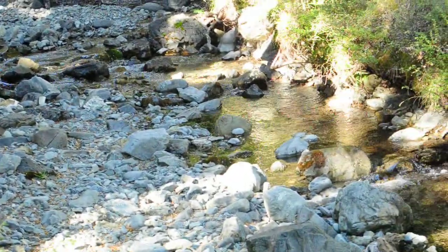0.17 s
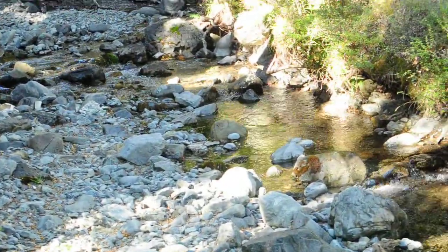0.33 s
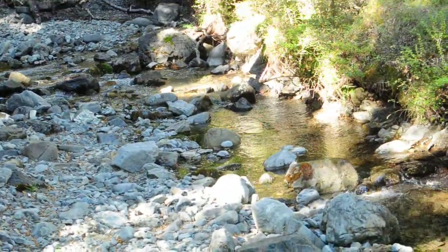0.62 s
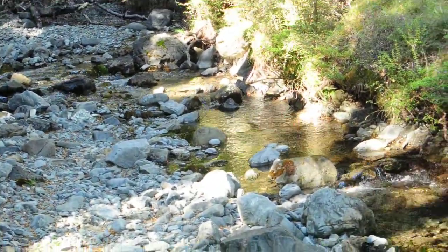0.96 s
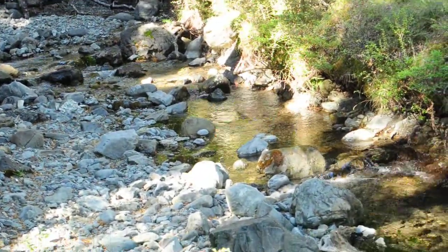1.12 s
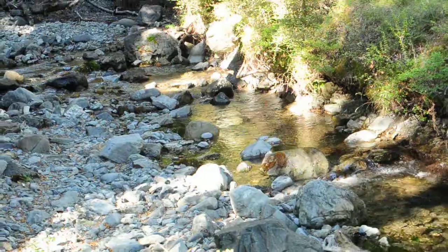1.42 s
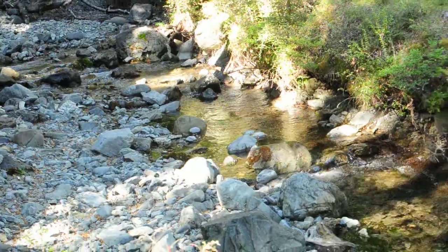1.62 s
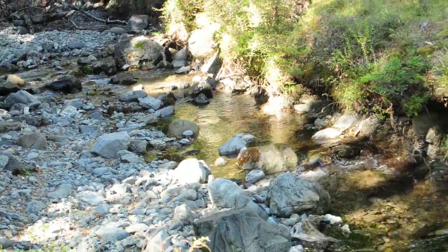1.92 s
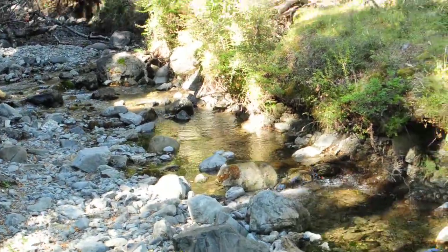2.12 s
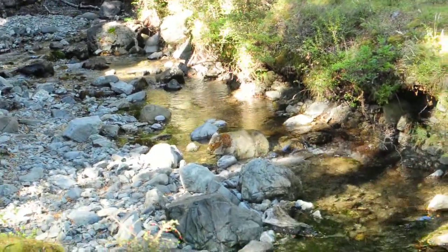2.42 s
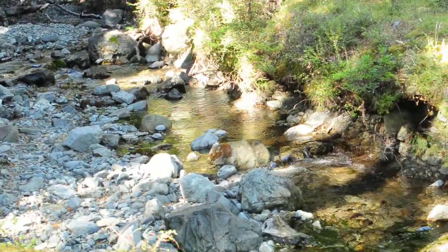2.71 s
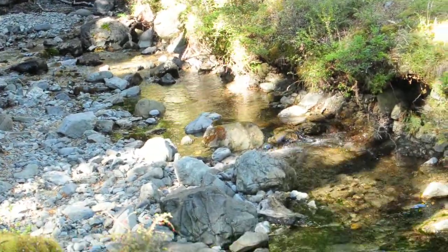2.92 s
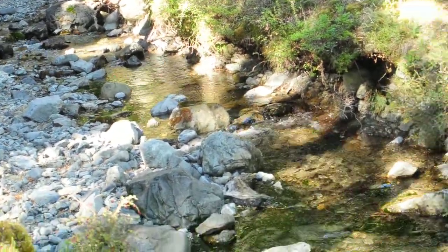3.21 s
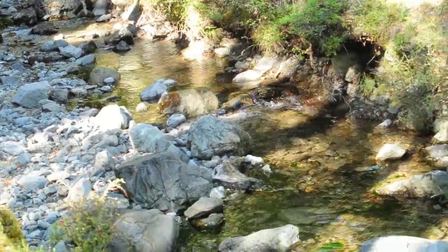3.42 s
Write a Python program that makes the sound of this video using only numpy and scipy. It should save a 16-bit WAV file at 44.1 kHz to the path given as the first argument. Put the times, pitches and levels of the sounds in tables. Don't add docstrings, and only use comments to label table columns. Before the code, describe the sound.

Steady stream water, hissing spray over a faint low churn, with ringing bubbles, ticking droplets and late stronger gurgles; very soft finger bumps and one creak-click from the hand-held recorder, outdoors and dry.

```python
import sys
import numpy as np
from scipy import signal
from scipy.fft import rfft, irfft
from scipy.io import wavfile

SR = 44100
rng = np.random.default_rng(int(sys.argv[2]) if len(sys.argv) > 2 else 0)


def int16_out(signal):
    q = np.round(np.clip(np.atleast_2d(signal).T, -1, 1) * 32767)
    wavfile.write(sys.argv[1], SR, q.astype(np.int16))


def voltage_ratio(level):
    return 10 ** (np.asarray(level, float) / 20)


N = 156996


def rms_one(x):
    return x / np.sqrt(np.mean(x ** 2) + 1e-20)


def at_hz(points, hz):
    f, db = np.transpose(points)
    return np.interp(np.log(hz), np.log(f), db)


def butter(x, order, hz, kind):
    return signal.sosfilt(signal.butter(order, hz, kind, fs=SR, output="sos"), x)


def drift(rate_hz):
    r = np.exp(-80 * np.pi * rate_hz / SR)
    steps = rng.standard_normal(N // 40 + 2002)
    slow = signal.lfilter([1], [1, -2 * r, r * r], steps)[2000:]
    slow = rms_one(slow - slow.mean())
    return np.interp(np.arange(N) / 40, np.arange(len(slow)), slow)


def ring(clicks, hz, t60):
    r, w = voltage_ratio(-60 / (t60 * SR)), 2 * np.pi * hz / SR
    return signal.lfilter([0, np.sin(w)], [1, -2 * r * np.cos(w), r * r], clicks + 1e-18)


def hiss(spectrum, shared_db, own_db, rate_hz):
    hz = np.maximum(np.fft.rfftfreq(N, 1 / SR), 1)
    inside = (hz > spectrum[0][0]) & (hz < spectrum[-1][0])
    shaped = rfft(rng.standard_normal(N)) * voltage_ratio(at_hz(spectrum, hz)) * inside
    step = 2 * np.log2(hz)
    together = drift(rate_hz)
    out = 0
    for k in range(int(step[inside].min()), int(step[inside].max()) + 2):
        band = irfft(shaped * np.clip(1 - abs(step - k), 0, 1), N)
        out = out + voltage_ratio(shared_db * together + own_db * drift(rate_hz)) * band
    return rms_one(out)


def grains(per_s, cycles, spread_db, pitches, gains_db, clump_db, clump_rate_hz):
    soft_cycles = 3.1
    sizes = voltage_ratio(spread_db * np.minimum(rng.exponential(1, N), 4)) * rng.choice([-1, 1], N)
    born = rng.random(N) < per_s * voltage_ratio(clump_db * drift(clump_rate_hz)) / SR
    dealt = rng.integers(0, len(pitches), N)
    out = 0
    for k, (hz, gain_db) in enumerate(zip(pitches, gains_db)):
        soft = ring(sizes * born * (dealt == k), hz, soft_cycles / hz)
        out = out + voltage_ratio(gain_db) * rms_one(ring(soft, hz, cycles / hz))
    return rms_one(out)


def blips(rows, cycles, rise, swell, gain_db):
    out = np.zeros(N + SR)
    for s, db, hz in rows:
        turn = np.arange(int(cycles / hz * SR)) / SR * hz
        shape = (1 - np.exp(-turn / swell)) * voltage_ratio(-60 * turn / cycles)
        tone = np.sin(2 * np.pi * turn * (1 + rise * turn / cycles))
        i = int(s * SR)
        out[i:i + len(turn)] += voltage_ratio(db + gain_db) * shape / shape.max() * tone
    return out[:N]


# t/s, level/dB
FLOW_STRENGTH = [(0, -34.5), (.2, -32.5), (.45, -33.5), (.85, -33), (1.15, -34), (1.4, -32), (1.75, -33.5),
                 (1.9, -31.5), (2.1, -33.5), (2.3, -31.5), (2.55, -33.5), (2.75, -32), (2.92, -33),
                 (3.05, -31.5), (3.2, -32.5), (3.28, -33), (3.4, -32), (3.56, -33.5)]


def flow_swing():
    s, db = np.transpose(FLOW_STRENGTH)
    return np.interp(np.arange(N) / SR, s, db - db.mean())


# f/Hz, level/dB (per Hz)
SPRAY_COLOUR = [(560, -16.5), (780, -4), (1200, 0.5), (1600, -5), (2100, -4), (6300, -15), (9500, -27),
                (15700, -50.5)]


def spray(swing):
    return voltage_ratio(-34.5 + 0.7 * swing) * hiss(SPRAY_COLOUR, shared_db=1.0, own_db=1.92, rate_hz=78)


# f/Hz, level/dB (per Hz)
CHURN_COLOUR = [(18, -19), (70, -24.5), (170, -11), (228, -12.5), (305, -1.5), (400, -4), (520, -7),
                (700, -12)]


def churn(swing):
    return voltage_ratio(-49 + swing) * hiss(CHURN_COLOUR, shared_db=1.5, own_db=1.5, rate_hz=20)


# f/Hz, level/dB
BUBBLE_LOUDNESS = [(260, -29), (320, -11.5), (560, -17), (780, -2), (1200, -3), (2100, -1), (4000, -13.5),
                   (8000, -9.5)]


def bubbles(swing):
    pitches = np.geomspace(260, 8000, num=40)
    gains_db = at_hz(BUBBLE_LOUDNESS, pitches)
    return voltage_ratio(-38.5 + swing) * grains(per_s=1500, cycles=37, spread_db=2, pitches=pitches,
                                       gains_db=gains_db, clump_db=2, clump_rate_hz=30)


def drops(swing):
    pitches = np.geomspace(2200, 10000, num=12)
    gains_db = -4.5 * np.log2(pitches / 2000)
    return voltage_ratio(-44.5 + 0.7 * swing) * grains(per_s=1200, cycles=12, spread_db=4, pitches=pitches,
                                             gains_db=gains_db, clump_db=6.5, clump_rate_hz=40)


# t/s, level/dB (peak), f/Hz
GURGLES = [(0.115, -23, 1260), (0.141, -29, 1200), (0.218, -20.5, 1270), (0.313, -23, 1230),
           (0.5, -24, 1070), (0.542, -19, 1254), (0.722, -27, 955), (0.786, -22.5, 1210),
           (0.8883, -23.5, 1150), (1.196, -21, 1250), (1.356, -26, 1280), (1.389, -22, 870),
           (1.526, -21.5, 776), (1.561, -24, 907), (1.846, -24, 1210), (1.985, -22, 1390),
           (2.157, -23.5, 1080), (2.181, -24, 1180), (2.215, -16.5, 1170), (2.286, -20, 860),
           (2.647, -21, 767), (2.697, -20, 1240), (2.978, -24, 786), (3.013, -17.5, 1140),
           (3.051, -23, 790), (3.067, -17.5, 950), (3.111, -16, 1164), (3.195, -14.5, 1220),
           (3.367, -19, 950), (3.477, -25, 1180)]
# t/s, level/dB (peak), f/Hz
MORE_GURGLES = [(.159, -23.5, 1065), (.345, -25, 1200), (.365, -24, 1590), (.856, -25, 2450),
                (.861, -23, 1980), (.872, -25, 1310), (.916, -25, 2010), (.997, -25, 1030),
                (1.06, -24, 1050), (1.077, -23, 2020), (1.222, -23, 1190), (1.328, -23, 1280),
                (1.37, -22, 810), (1.415, -24, 1200), (1.484, -28, 1050), (1.602, -24.5, 1100),
                (1.622, -27, 1060), (1.642, -27, 850), (1.915, -20, 1166), (1.933, -23, 1110),
                (2.2156, -23, 1100), (2.233, -25, 1050), (2.293, -28, 990), (2.311, -23, 1050),
                (2.319, -20, 1010), (2.725, -23, 1170), (3.085, -23, 1210), (2.85, -25, 1900),
                (2.872, -23, 1950), (3.204, -23.5, 1730), (3.541, -24, 826)]


def gurgles():
    rows = list(GURGLES) + list(MORE_GURGLES)
    return blips(rows, cycles=24, rise=0.16, swell=0.41, gain_db=-3)


# t/s, level/dB (peak), f/Hz
STONE_POPS = [(0.1371, -20, 2130), (0.175, -20, 1770), (0.2673, -20, 1960), (0.3502, -14, 1640),
              (0.5886, -17.5, 2030), (0.721, -20, 2430), (0.8205, -24, 1990), (1.001, -22, 1680),
              (1.3174, -17, 2200), (1.6955, -24, 2050), (1.9031, -14, 2880), (1.929, -24, 2110),
              (2.319, -25, 2760), (2.3456, -25.5, 2110), (2.4428, -19, 2020), (2.5062, -17, 1850),
              (2.599, -28.5, 2220), (2.7574, -18, 1700), (2.9676, -21, 2010), (3.0076, -20.5, 1610),
              (3.033, -21, 1970), (3.1313, -17, 2050), (3.1944, -23, 2190), (3.3847, -17, 2170)]


def pops():
    return blips(STONE_POPS, cycles=21.4, rise=0.13, swell=0.8, gain_db=-7.5)


# t/s, level/dB (peak), f/Hz
SMALL_DROPLETS = [(0.1398, -32.0, 4310.0), (0.1797, -32, 3600), (0.1992, -32, 4010.0),
                  (0.2283, -39, 6630.0), (0.2806, -30, 5680.0), (0.2835, -31.0, 4090.0),
                  (0.2981, -35, 7450.0), (0.3111, -45.0, 8960.0), (0.352, -37.0, 6680.0),
                  (0.354, -39, 8830.0), (0.4244, -38, 8830.0), (0.6064, -33, 6290.0),
                  (0.7515, -33.0, 5170.0), (0.8454, -38, 8570.0), (0.8883, -39, 8660.0),
                  (0.9162, -39, 8010.0), (1.3587, -28.5, 6160.0), (1.3619, -28, 3010.0),
                  (1.444, -42, 8740.0), (1.4609, -33, 6240.0), (1.5034, -39.0, 7280.0),
                  (1.5617, -39.0, 7280.0), (1.5759, -30, 2760.0), (1.592, -30, 3960.0),
                  (1.686, -39, 8270.0), (1.8762, -28, 2790), (1.9065, -42.0, 8400.0),
                  (2.123, -37.0, 7110.0), (2.1633, -34.0, 5990.0), (2.1933, -39.0, 7540.0),
                  (2.2156, -33.0, 4650.0), (2.2657, -40, 8440.0), (2.3182, -32, 2700),
                  (2.3185, -40.0, 7710.0), (2.3245, -35, 7020.0), (2.3314, -34, 4480.0),
                  (2.3769, -32, 6200.0), (2.3933, -34.0, 6200.0), (2.4202, -33.0, 5940.0),
                  (2.4762, -36, 8270.0), (2.5056, -35, 8350.0), (2.6227, -35, 5080.0),
                  (2.6956, -28, 6070.0), (2.7976, -29, 2920), (2.8563, -43, 8140.0), (2.967, -27, 1940.0),
                  (3.0058, -32, 3660.0), (3.0071, -29.5, 2730), (3.1192, -42.0, 7920.0),
                  (3.1494, -30.5, 3340), (3.1919, -31.0, 4820.0), (3.2848, -41, 7710.0),
                  (3.3155, -31, 3490.0), (3.3412, -32, 6460.0), (3.5068, -33, 8310.0), (3.535, -32, 3600)]


def droplets():
    return blips(SMALL_DROPLETS, cycles=24, rise=0.057, swell=1.3, gain_db=4)


# t/s, level/dB (peak), f/Hz
STONE_TICKS = [(0.2284, -30, 3930), (0.2563, -31, 4600), (0.2813, -32, 4170), (0.3526, -29, 4080),
               (0.3915, -30, 4030), (0.5357, -25, 5200), (0.618, -26, 4050), (0.7243, -26, 4540),
               (0.7517, -26, 5680), (1.5868, -26, 4460), (1.6312, -27, 5180), (1.6866, -31, 4220),
               (1.8437, -29, 3860), (1.9031, -25, 4420), (2.156, -25, 4370), (2.1939, -26.5, 4210),
               (2.3181, -29, 4450), (2.4204, -27.5, 4590), (2.5032, -27, 4920), (2.6209, -35, 5140),
               (2.6958, -20.5, 5030), (3.04, -18.5, 5670), (3.1408, -27, 4160), (3.1916, -26, 4900),
               (3.3413, -30, 4800), (3.3887, -24, 4660), (3.454, -27, 5200), (3.5064, -35, 4590)]


def ticks():
    return blips(STONE_TICKS, cycles=21, rise=0.19, swell=1.0, gain_db=0.5)


# t/s, level/dB (peak), f/Hz
FINGER_BUMPS = [(.375, -59, 35), (.72, -43, 170), (1.365, -46, 164), (1.535, -52, 135), (1.955, -42, 156),
                (2.345, -54, 109), (3.125, -37, 201), (3.165, -49, 130), (3.285, -43.5, 180),
                (3.385, -52, 125), (3.47, -49, 130)]


def bumps():
    return blips(FINGER_BUMPS, cycles=7, rise=-0.064, swell=0.84, gain_db=0)


# t/s, level/dB (peak), f/Hz
HARD_SNAPS = [
    (.8448, -39, 10000),
    (.8462, -58, 14200),
    (.848, -19.5, 2200),
    (.8884, -18.5, 1520),
    (.891, -24.5, 1600),
    (1.0506, -13.5, 3180),
    (2.2404, -15, 2620),
]


def snaps():
    return blips(HARD_SNAPS, cycles=7.5, rise=0.037, swell=0.82, gain_db=0.5)


# t/s, level/dB (peak), f/Hz
HOLLOW_GLUGS = [
    (1.365, -34, 307),
    (1.907, -38.5, 310),
    (2.79, -32.5, 415),
    (3.01, -31, 320),
    (3.11, -26.5, 318),
]


def glugs():
    return blips(HOLLOW_GLUGS, cycles=8.1, rise=-0.098, swell=1.3, gain_db=-0.93)


def rasp():
    start_s, length_s = 1.9826, 0.0098
    t = np.arange(N) / SR - start_s
    fade = voltage_ratio(-6 * np.clip(t / length_s, 0, 1))
    burst = rng.standard_normal(N) * (t > 0) * (t < length_s) * fade
    return voltage_ratio(-37) * butter(burst, 2, [8500, 1.36 * 8500], "band")


# t/s, level/dB
CREAK_SLIPS = [
    (1.983, -20),
    (1.9848, -14),
    (1.985, -16),
    (1.986, -8.5),
    (1.9876, -16),
    (1.9876, -18),
    (1.9883, -17),
    (1.9903, -20),
    (1.9905, -23),
    (1.9940, -25),
]
# f/Hz, level/dB, t60/s (time to fall 60 dB)
HOUSING_RINGS = [(1580, -14, 0.013), (2620, -5.5, 0.0065), (2930, -2, 0.0078), (3580, -3.5, 0.0064),
                 (4300, -9.5, 0.005), (5340, -16.5, 0.0049), (6030, -17, 0.0053), (6670, -16, 0.006),
                 (7400, -17, 0.0057), (7950, -19.5, 0.005), (10700, -34, 0.0027)]


def creak():
    s, db = np.transpose(CREAK_SLIPS)
    out = 0
    for k, (hz, level_db, t60) in enumerate(HOUSING_RINGS):
        clicks = np.zeros(N)
        uneven_db = rng.normal(0, 1.1, len(s))
        clicks[(s * SR).astype(int)] = voltage_ratio(db + level_db + 2.5 + uneven_db) * (-1) ** k
        out = out + ring(clicks, hz, t60)
    return butter(out, 3, [1200, 11500], "band")


def stream():
    swing = flow_swing()
    near = bubbles(swing) + drops(swing) + gurgles() + pops() + droplets() + ticks()
    near = butter(near, 4, 8840, "low")
    near = butter(near, 4, 240, "high")
    return spray(swing) + churn(swing) + near + snaps() + glugs()


def scene():
    handling = bumps() + rasp() + creak()
    return (stream() + handling)[None]


def low_pass(x):
    return signal.sosfilt(signal.butter(12, 15610, fs=SR, output="sos"), x)


def record(dry):
    cut = signal.sosfilt(signal.cheby2(12, 60, 16300, fs=SR, output="sos"), dry)
    return low_pass(cut)


dry = scene()
out = record(dry)
int16_out(out)
```